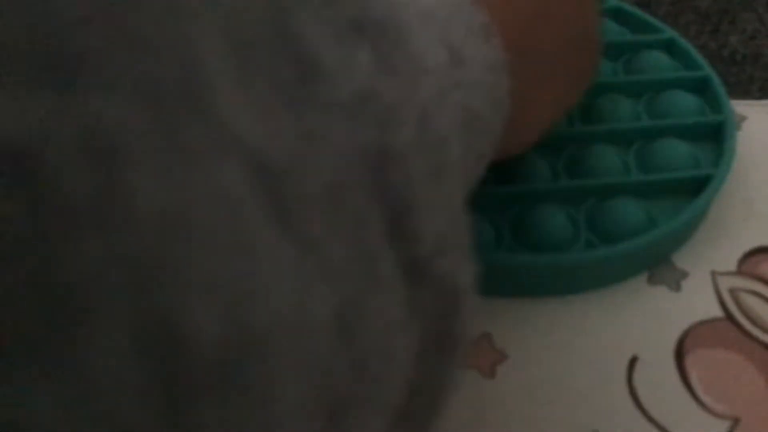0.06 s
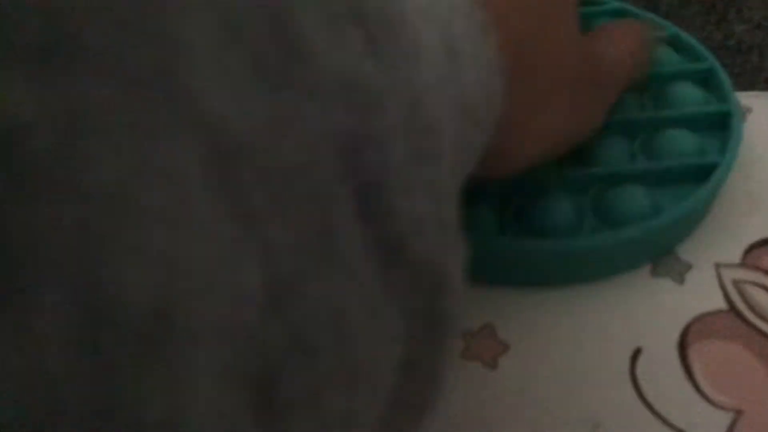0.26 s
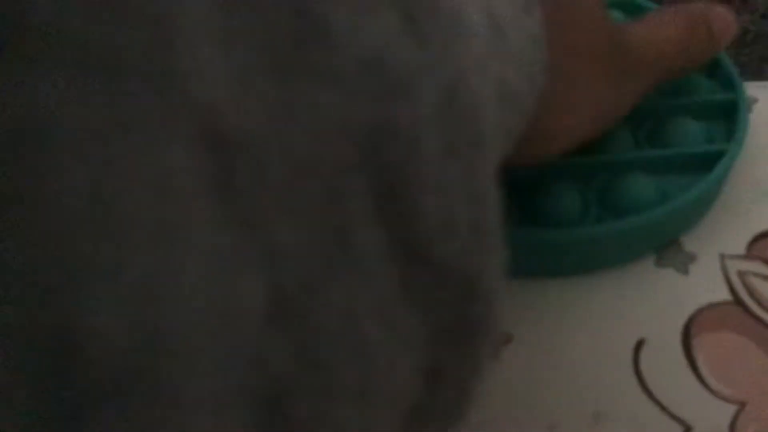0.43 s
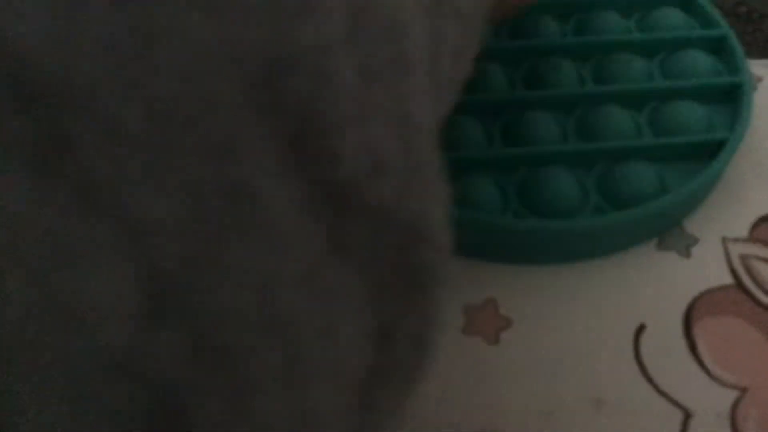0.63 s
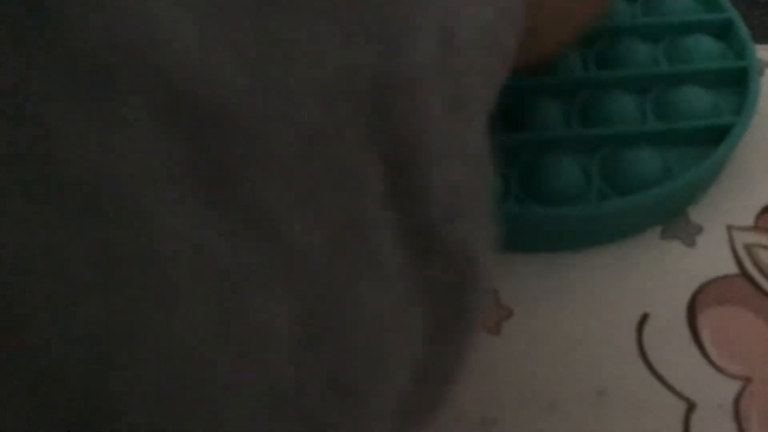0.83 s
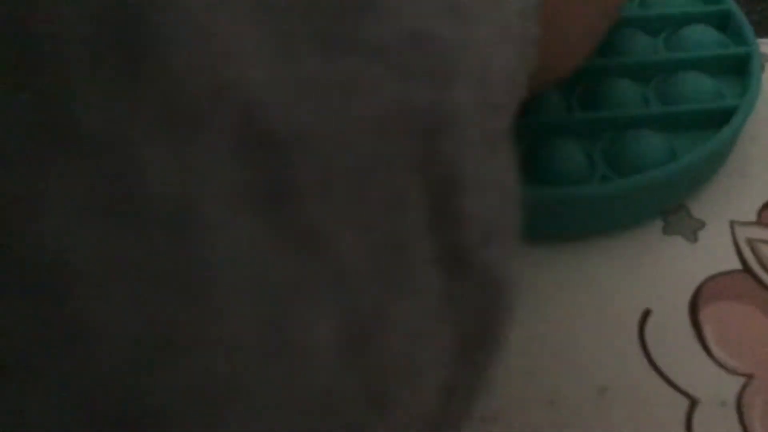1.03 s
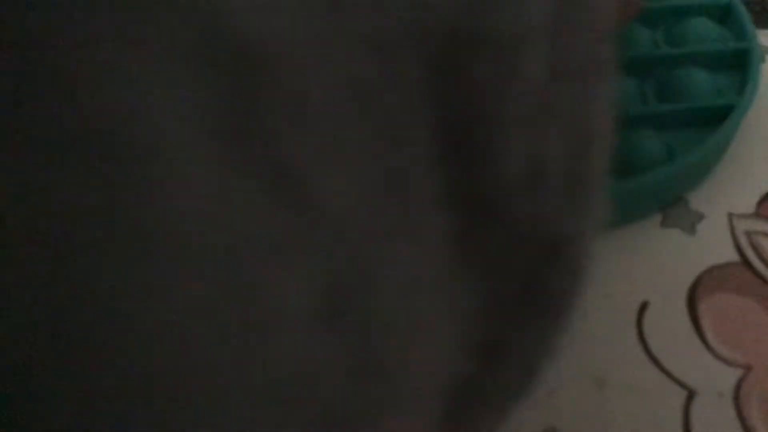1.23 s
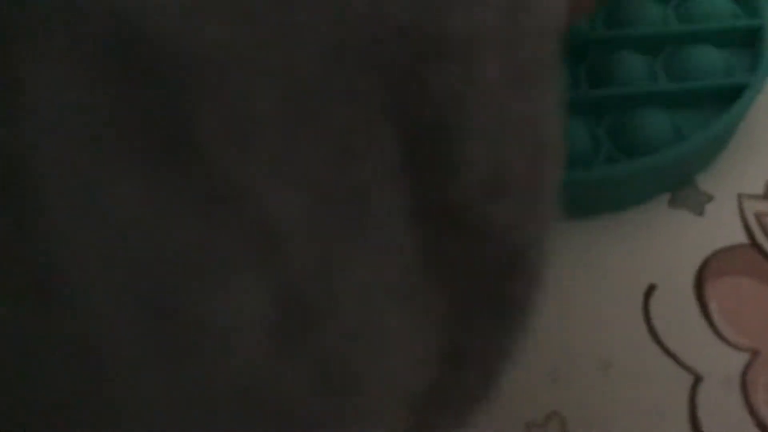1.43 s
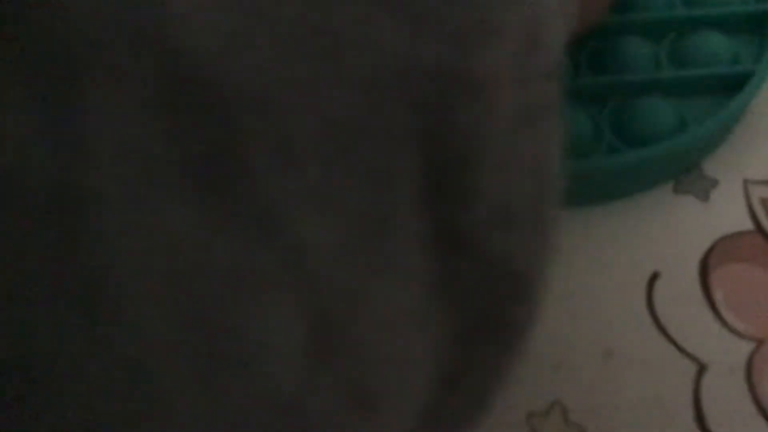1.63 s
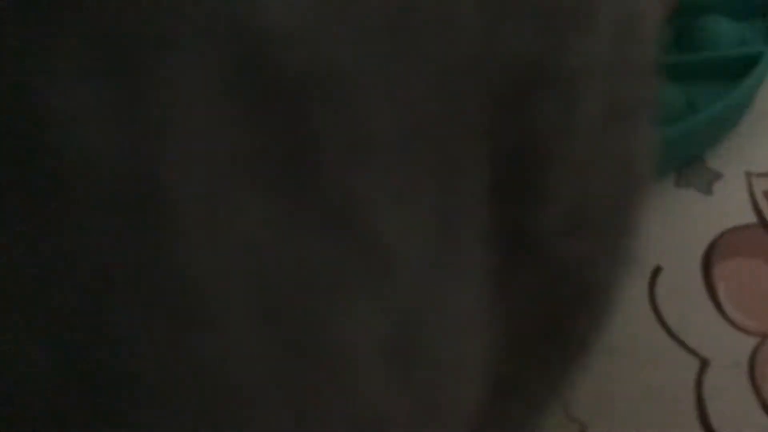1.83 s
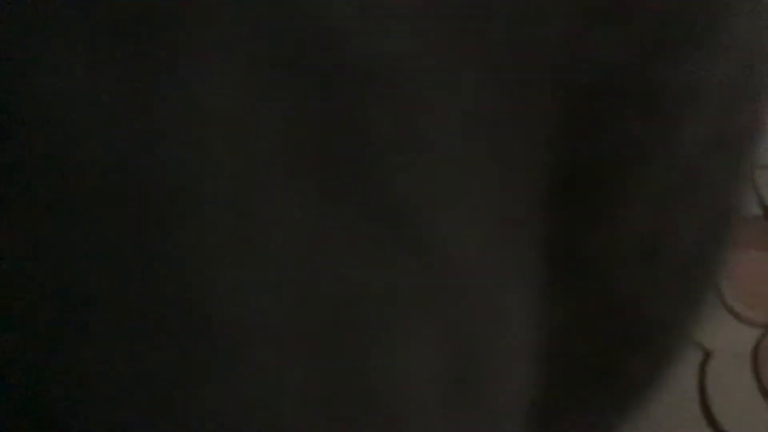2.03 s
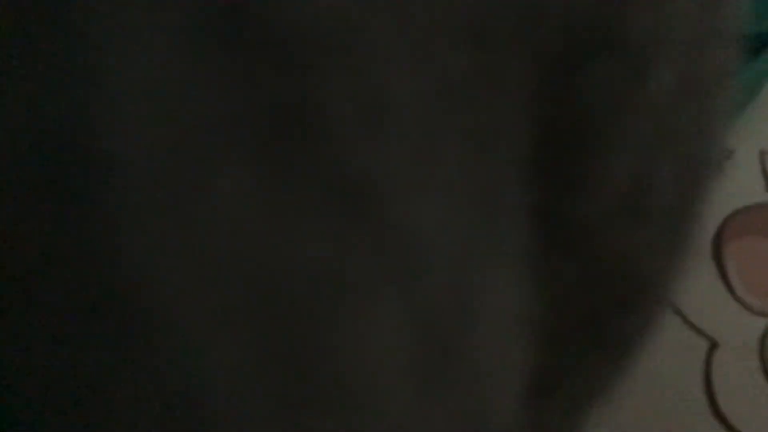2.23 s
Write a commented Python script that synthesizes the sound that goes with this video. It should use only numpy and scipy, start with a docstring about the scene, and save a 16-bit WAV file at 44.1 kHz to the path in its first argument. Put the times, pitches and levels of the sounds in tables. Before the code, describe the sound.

Soft rubbery pops of a bubble fidget toy pressed on a table, close up, small quiet room

```python
"""A finger presses the bubbles of a silicone fidget toy lying on a play table in a small room.
Each pop is a short sine sinking in pitch with a brief overtone; wall snaps and frame clicks are damped modes.
The presses thump the table top, which answers with low, dull swells sinking in pitch, and trembles as low noise.
Skin and a sleeve rub softly over the rubber as coloured noise of uneven level.
A short diffuse tail and a low noise floor make up the room."""
import sys
import numpy as np
from scipy import signal
from scipy.fft import rfft, irfft
from scipy.io import wavfile

SR = 44100
rng = np.random.default_rng(int(sys.argv[2]) if len(sys.argv) > 2 else 0)


def pcm_store(signal):
    """Save signal as 16-bit PCM."""
    levels = np.round(np.clip(np.atleast_2d(signal), -1, 1) * 32767)
    wavfile.write(sys.argv[1], SR, levels.astype(np.int16).T)


N = 100107
T = np.arange(N) / SR  # time [s]


def from_db(db):
    """Decibels to gain."""
    return 10 ** (np.asarray(db) / 20)


def rms_one(x):
    """Scale to rms 1."""
    return x / np.sqrt(np.mean(x ** 2) + 1e-20)


def add(out, start_s, sound):
    """Mix a sound in at its start time, cut at the end of the scene."""
    start = int(start_s * SR)
    out[start:start + len(sound)] += sound[:max(N - start, 0)]


def low_pass(x, hz, order=2):
    """Butterworth low-pass."""
    sections = signal.butter(order, min(hz, SR / 2 - 1), fs=SR, output="sos")
    return signal.sosfilt(sections, x)


def high_pass(x, hz, order=2):
    """Butterworth high-pass."""
    sections = signal.butter(order, hz, "high", fs=SR, output="sos")
    return signal.sosfilt(sections, x)


def noise(colour):
    """Random noise shaped to a spectrum, fading below its lowest point, rms 1."""
    hz, db = np.transpose(colour)
    bins_hz = np.maximum(np.arange(N // 2 + 1) * SR / N, 1)
    gain = from_db(np.interp(np.log(bins_hz), np.log(hz), db))
    gain *= np.minimum(bins_hz / hz[0], 1) ** 2
    spectrum = rfft(rng.standard_normal(N)) * gain
    return rms_one(irfft(spectrum, N))


def flicker(rate_hz):
    """Random wobble below a rate, spread 1."""
    wobble = low_pass(rng.standard_normal(N + SR), rate_hz)
    return rms_one(wobble[SR:])  # the filter has settled after a second


def falling_tone(t, hz, glide, glide_s):
    """A sine that starts sharp by the share glide and sinks to its pitch."""
    return np.sin(2 * np.pi * hz * (t + glide * glide_s * (1 - np.exp(-t / glide_s))))


def struck(hits, modes, top_order):
    """Each hit rings the damped modes with slightly different strengths, under its own brightness edge."""
    low_modes_below_hz = 1790
    out, t = np.zeros(N), T[:SR // 16]
    for start_s, db, top_hz, low_db in hits:
        ring = np.zeros(len(t))
        for k, (hz, mode_db, t60_s) in enumerate(modes):
            lift_db = low_db / (1 + (hz / low_modes_below_hz) ** 2)
            weight = from_db(mode_db + rng.standard_normal() + lift_db)
            decay = np.exp(-np.log(1000) * t / t60_s)
            sign = (-1) ** k  # neighbouring modes start in opposite directions
            ring += sign * weight * decay * np.sin(2 * np.pi * hz * t)
        add(out, start_s, from_db(db) * low_pass(ring, top_hz, order=top_order))
    return out


def room_floor():
    """The low hush of the room is steady noise, weak in the treble."""
    # hush spectrum: (frequency [Hz], relative density [dB])
    floor_colour = [(25, -13.5), (50, -1), (75, -4.5), (105, 3), (150, -8.5), (210, -12), (400, -14.5),
                    (900, -28.5), (2000, -30), (5000, -36), (8000, -41.5), (15000, -47.5)]
    return from_db(-65) * noise(floor_colour)


def rubbing():
    """Short grainy swishes of skin, and a duller sleeve that drags along in uneven scrapes."""
    # skin slides on the rubber: (middle [s], level [dB], half length [s])
    rubs = [(0.056, -65, 0.043), (0.233, -51.5, 0.022), (0.29, -60.5, 0.014), (0.605, -55.5, 0.014),
            (0.876, -56.5, 0.035), (1.034, -71.5, 0.014), (1.274, -58, 0.0092), (1.292, -55, 0.046),
            (1.955, -62.5, .013), (2.067, -61.5, 0.04)]
    # sleeve level over time: (time [s], level [dB])
    sleeve_level = [(0, -107), (.2, -110), (.33, -57), (.39, -55), (.55, -54), (.68, -56.5), (.78, -61),
                    (1.05, -73), (1.2, -67), (2.27, -69)]
    # spectra of skin, sleeve and scrapes: (frequency [Hz], relative density [dB])
    rub_colour = [(150, 7), (300, 12), (650, -0.5), (920, -4), (1350, -6), (2800, -11.5), (5000, -16.5),
                  (7500, -25.5), (15000, -31)]
    sleeve_colour = [(60, 1.5), (120, 3), (280, 8.5), (420, -1), (600, -11), (880, -19.5), (1250, -24.5),
                     (2500, -27.5), (5000, -37), (15000, -48.5)]
    scrape_colour = [(250, -17), (450, 3), (620, 9.5), (880, -6), (1220, 0.5), (1900, -19), (5000, -28),
                     (15000, -64)]
    rub_rough_db, sleeve_rough_db, scrape_rough_db = 1.5, 2, 2.5
    scrape_db = -10  # against the sleeve

    swishes = np.zeros(N)
    for middle_s, db, half_s in rubs:
        swishes += from_db(db) * np.exp(-0.5 * ((T - middle_s) / half_s) ** 2)
    skin = swishes * from_db(rub_rough_db * flicker(120)) * noise(rub_colour)

    sleeve_db = np.interp(T, *np.transpose(sleeve_level)) + sleeve_rough_db * flicker(42)
    scrapes = from_db(scrape_db + scrape_rough_db * flicker(70)) * noise(scrape_colour)
    sleeve = from_db(sleeve_db) * (noise(sleeve_colour) + scrapes)
    return skin + sleeve


def thumps():
    """The table top swells and dies within a few cycles, its higher bending waves arriving first."""
    # the table top is pushed or let go: (time [s], level [dB], settled pitch [Hz], swell time [s])
    table_pushes = [(0.077, -47, 108, 0.0072), (0.202, -43.5, 145, .008), (.2240, -22.5, 91.8, 0.012),
                    (0.2506, -28, 96, 0.013), (0.279, -42, 79, 0.014), (0.416, -43, 97, 0.0047),
                    (0.577, -29.5, 102, 0.0082), (0.595, -32, 88.6, 0.015), (.640, -40.5, 63.3, 0.019),
                    (0.671, -44, 100, 0.0073), (0.745, -26.5, 147.5, 0.0066), (0.7565, -27, 96.7, 0.013),
                    (0.8492, -32.5, 110, 0.011), (0.8684, -26.5, 69.2, 0.017), (1.009, -45.5, 96.8, 0.018),
                    (1.151, -55, 109.5, 0.026), (1.28, -26, 85.2, 0.016), (1.31, -25, 96, 0.011),
                    (1.344, -31, 91.5, .014), (1.386, -33, 98.7, 0.0071), (1.4029, -29.5, 71.4, 0.011),
                    (1.539, -43.5, 117, 0.012), (1.567, -32.5, 88, 0.0081), (1.605, -42, 90.9, 0.036),
                    (1.641, -38.5, 86.4, 0.028), (1.6994, -30.5, 68.8, 0.012), (1.746, -47.5, 95, 0.0082),
                    (1.815, -58.5, 100.8, 0.034), (1.9499, -34.5, 92.8, 0.016), (2.044, -39, 102.6, 0.0081),
                    (2.0674, -26.5, 84.3, 0.014), (2.102, -45, 101.7, 0.012), (2.1269, -35, 90, 0.012),
                    (2.156, -46.5, 86, 0.014), (2.203, -50, 132.5, 0.0061), (2.2178, -34, 83, 0.0081)]
    glide, glide_s, shape = 1, 0.0061, 2.65  # starts an octave up; a higher shape narrows the swell
    out, t = np.zeros(N), T[:SR // 4]
    for start_s, db, hz, swell_s in table_pushes:
        envelope = (t / swell_s * np.exp(1 - t / swell_s)) ** shape
        add(out, start_s, from_db(db) * envelope * falling_tone(t, hz, glide, glide_s))
    return out


def pops():
    """A flipping dome gives a few cycles that fall in pitch and die at once, with a brief overtone."""
    # a bubble flips over: (time [s], level [dB], settled pitch [Hz], decay [s], overtone level [dB])
    flips = [(0.2043, -57, 245, .006, -16), (0.2263, -34, 254, 0.0067, 1), (0.355, -57, 273, 0.009, 9),
             (.5765, -38, 275, 0.0067, 5.5), (0.7388, -26, 290, 0.0091, -25),
             (1.2723, -18.5, 248, 0.0026, -8), (1.5850, -24, 236, 0.0022, -11),
             (1.6935, -26, 216, 0.002, -17), (2.0651, -29.5, 293, 0.0017, -4),
             (2.2014, -60, 303, 0.0015, 3), (2.2655, -27, 245, 0.004, -7.5)]
    glide, glide_s, attack_s = 0.32, 0.0047, 0.00073
    overtone_ratio, overtone_decay_s = 2.14, 0.0025
    out, t = np.zeros(N), T[:SR // 8]
    attack = 1 - np.exp(-t / attack_s)
    for start_s, db, hz, decay_s, overtone_db in flips:
        tone = np.exp(-t / decay_s) * falling_tone(t, hz, glide, glide_s)
        overtone = np.exp(-t / overtone_decay_s) * np.sin(2 * np.pi * hz * overtone_ratio * t)
        add(out, start_s, from_db(db) * attack * (tone + from_db(overtone_db) * overtone))
    return out


def snaps():
    """Bubble walls snap through and ring, with thin bright noise ticks on two of the pops."""
    # the rubber wall snaps: (time [s], level [dB], brightness edge [Hz], lift of the low modes [dB])
    wall_snaps = [(0.2275, -41, 3240, 3.5), (0.2346, -54.5, 2500, 15.5), (0.5774, -52, 1090, 10),
                  (0.7366, -28.5, 7550, -4.5), (0.989, -80, 8800, -10), (1.2715, -32.5, 4660, -15.5),
                  (1.5850, -54, 2000, 3.5), (1.6933, -48.5, 2100, -1), (1.7207, -53, 4000, -21),
                  (2.2650, -34.5, 3000, -26)]
    # modes of a bubble wall: (frequency [Hz], level [dB], t60 [s])
    wall_modes = [(556, -0.5, 0.0043), (1210, -14.5, 0.022), (1213, 3.5, 0.0098), (1590, -3, 0.018),
                  (2057, -7, 0.015), (3400, -9.5, 0.0097), (6060, -14.5, 0.0058), (8400, -20, 0.0021)]
    # bright ticks: (time [s], level [dB])
    tick_hits = [(0.738, -57), (1.2723, -56)]
    tick_decay_s, tick_low_hz = 0.00056, 8500
    out, t = struck(wall_snaps, wall_modes, top_order=2), T[:SR // 100]
    for start_s, db in tick_hits:
        burst = rng.standard_normal(len(t)) * np.exp(-t / tick_decay_s)
        add(out, start_s, from_db(db) * high_pass(burst, tick_low_hz))
    return out


def tremble():
    """The table top trembles under the resting hand: low noise that fades in and stays."""
    # tremble spectrum: (frequency [Hz], relative density [dB])
    tremble_colour = [(50, -6), (80, 1), (105, -1), (145, -10), (210, -12), (400, -30.5), (2000, -58)]
    from_s, fade_s = 0.26, 0.079
    fade_in = np.clip((T - from_s) / fade_s, 0, 1)
    return from_db(-59) * fade_in * noise(tremble_colour)


def clicks():
    """The frame taps the table: small dry clicks of damped modes with no top."""
    # the toy taps the table: (time [s], level [dB], brightness edge [Hz], lift of the low modes [dB])
    taps = [(.6012, -31, 5050, -5), (1.2762, -33.5, 4800, -20), (1.2795, -35, 4530, 1.5),
            (1.3438, -35.5, 4700, -5.5), (2.0645, -40.5, 4770, 8)]
    # modes of the toy's frame: (frequency [Hz], level [dB], t60 [s])
    frame_modes = [(610, -12, 0.0091), (1304, -0.5, 0.0088), (1610, -6, 0.019), (2080, -12, 0.011),
                   (3240, -10, 0.0062), (4300, -5, 0.0052)]
    return low_pass(struck(taps, frame_modes, top_order=2), 5700, order=8)


def room(x):
    """The small room answers with a short, dull, diffuse tail of decaying noise and little bass."""
    t60_s, level_db, delay_s = 0.1, -15, 0.014
    top_hz, low_hz = 3460, 131
    t = T[:SR // 2]
    tail = low_pass(rng.standard_normal(len(t)), top_hz)
    tail *= np.exp(-np.log(1000) * t / t60_s) * (t > delay_s)
    tail *= np.sqrt(2 * top_hz / SR / np.sum(tail ** 2))  # about unit power gain below the top
    reverb = from_db(level_db) * signal.fftconvolve(x, tail)[:N]
    return high_pass(reverb, low_hz)


def scene():
    """Toy and table close by with their room tail, over rubbing, tremble and the low hush of the room."""
    toy = pops() + snaps() + clicks() + thumps()
    mix = toy + room(toy) + rubbing() + tremble() + room_floor()
    return mix[None]  # one channel


def record(dry):
    """The microphone drops the deepest bass; a steep filter cuts the top."""
    without_rumble = high_pass(dry, 25.3, order=4)
    top_cut = signal.ellip(10, 0.1, 70, 15800, fs=SR, output="sos")  # ripple [dB], rejection [dB], edge [Hz]
    return signal.sosfilt(top_cut, without_rumble)


dry = scene()
out = record(dry)
pcm_store(out)
```